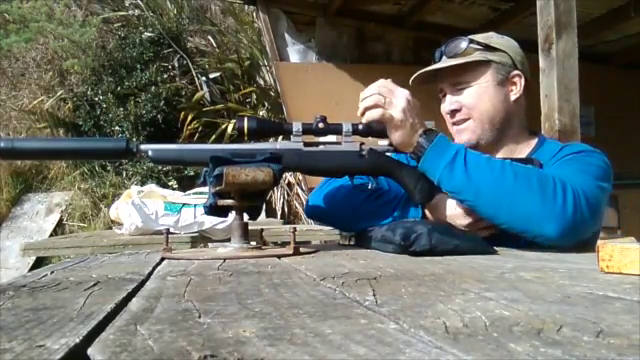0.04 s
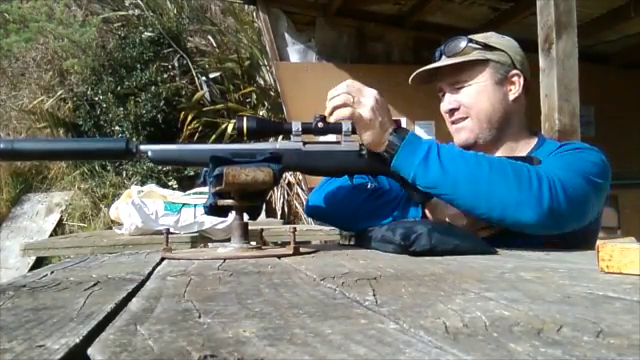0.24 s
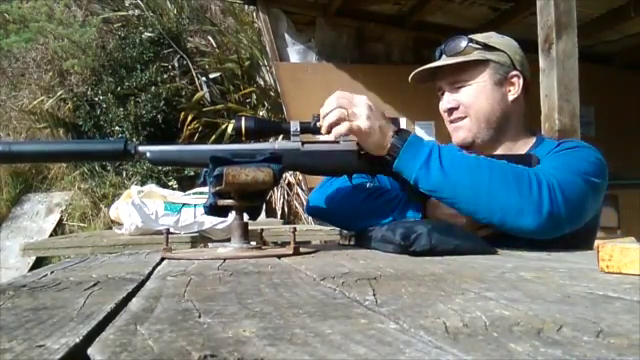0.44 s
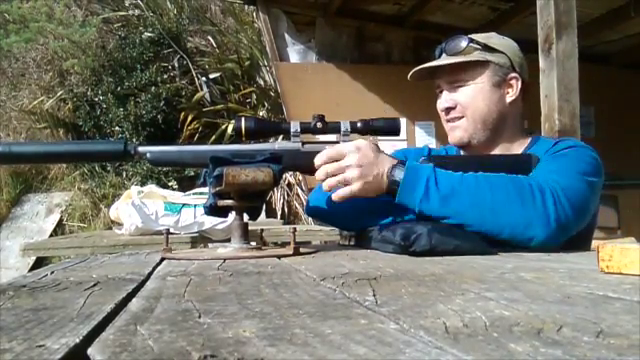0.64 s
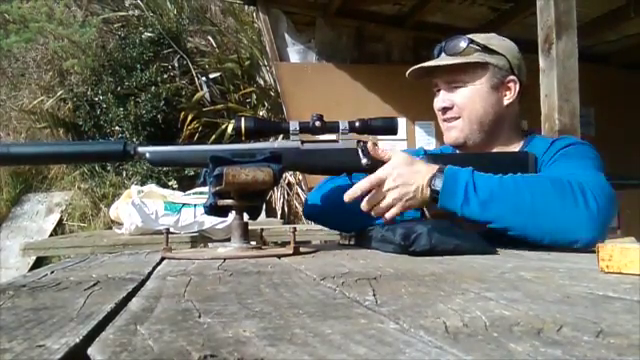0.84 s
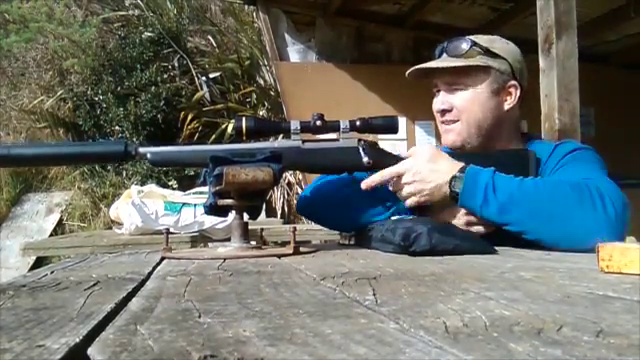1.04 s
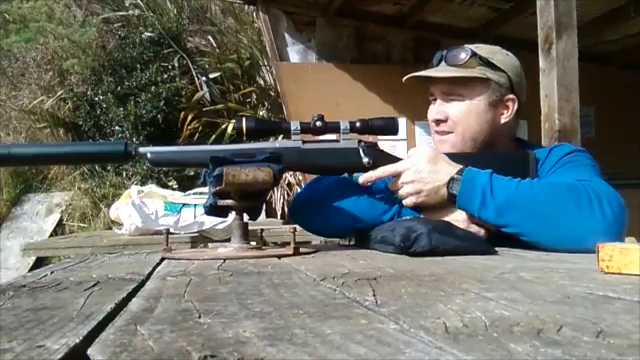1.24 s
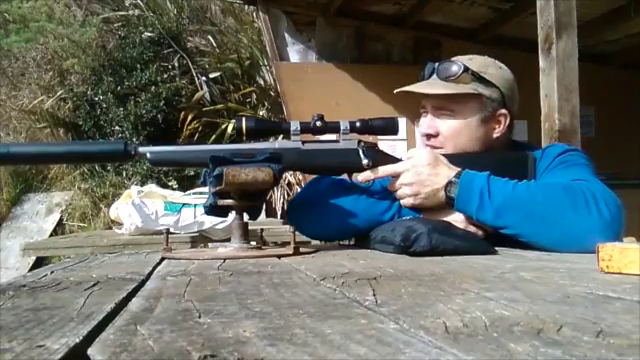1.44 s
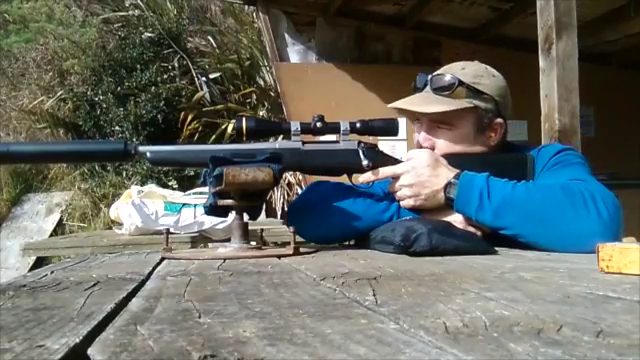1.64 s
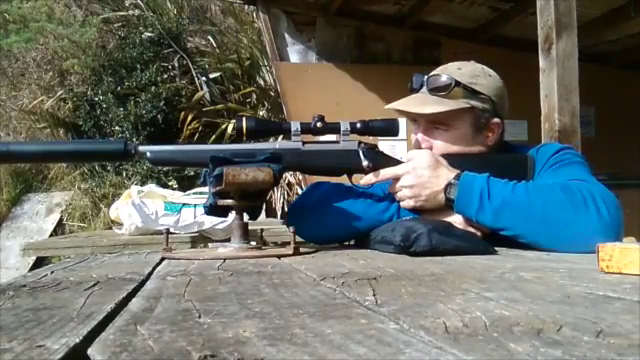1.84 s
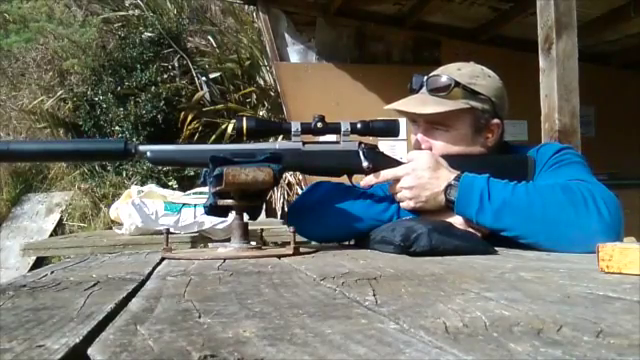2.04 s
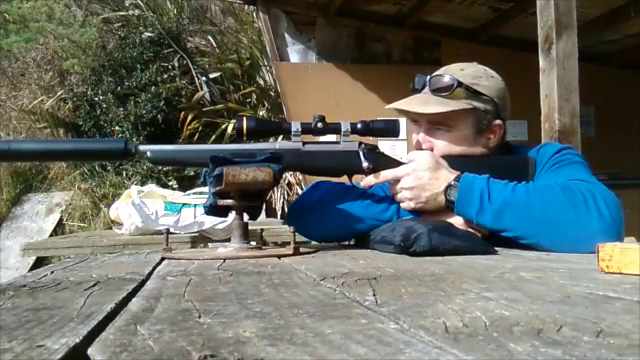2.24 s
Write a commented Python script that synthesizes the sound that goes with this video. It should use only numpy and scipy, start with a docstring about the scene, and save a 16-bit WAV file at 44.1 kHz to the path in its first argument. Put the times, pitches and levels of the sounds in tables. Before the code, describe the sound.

A rifle bolt is worked in two quick bursts of steel clicks, followed by soft cloth rustle

```python
"""Wind hiss, a low outdoor rumble and the first scrape of a rifle bolt open the scene under a shelter.
The bolt rubs softly, a brass case chimes as it is fed, and steel knocks ring the action as it is locked;
echoes and a short noise tail answer, and the wooden bench booms. Then a sleeve rustles as filtered grains,
far birds call as gliding sines, and small ticks fall. A phone picks it up."""
import sys
import numpy as np
from scipy import signal
from scipy.fft import rfft, irfft
from scipy.io import wavfile
from scipy.ndimage import uniform_filter1d

SR = 44100
rng = np.random.default_rng(int(sys.argv[2]) if len(sys.argv) > 2 else 0)


def transcribe(u):
    """Save the signal u as a 16-bit wav file named by the first command-line argument.

    u: samples, shape (n,) or (channels, n), limited to [-1, 1]; the rate is SR.
    q: integer samples, one column per channel.
    """
    v = np.clip(np.atleast_2d(u).T, -1, 1)
    q = np.round(v * 32767).astype(np.int16)
    wavfile.write(sys.argv[1], SR, q)


def voltage_ratio(level):
    """Linear amplitude factor for a level in decibels (scalar or array-like)."""
    return 10 ** (np.asarray(level, float) / 20)


N = 101429  # length in samples


def unit(x):
    """Normalisation: scale to rms 1."""
    return x / np.sqrt(np.mean(x ** 2))


def unit_energy(x):
    """Normalisation: scale an impulse response to energy 1."""
    return x / np.sqrt(np.sum(x ** 2))


def colour(x, points):
    """Linear filtering: spectral gain by (Hz, dB) points joined on a log frequency axis."""
    hz, db = np.array(points, float).T
    f = np.fft.rfftfreq(len(x), 1 / SR) + 1
    gain = voltage_ratio(np.interp(np.log(f), np.log(hz), db))
    return irfft(rfft(x) * gain, len(x))


def bump(x, hz, octaves):
    """Band-pass filtering: a bell on the octave axis around hz, scaled to rms 1."""
    f = np.fft.rfftfreq(len(x), 1 / SR) + 1
    bell = np.exp(-.5 * (np.log2(f / hz) / octaves) ** 2)
    return unit(irfft(rfft(x) * bell, len(x)))


def curve(rows, fade_s=0.013):
    """Amplitude envelope: gain along (s, dB) rows, fading out past both ends."""
    s, db = np.array(rows, float).T
    s = np.r_[s[0] - fade_s, s, s[-1] + fade_s]
    return voltage_ratio(np.interp(np.arange(N) / SR, s, np.r_[-130, db, -130]))


def decay(t, t60):
    """Exponential damping: 60 dB of fall in t60 s."""
    return np.exp(-np.log(1000) * t / t60)


def walk(rate):
    """Low-pass fluctuation: random values, rate a second, smoothed to a wander with spread near 1."""
    k = int(SR / rate)
    held = np.repeat(rng.standard_normal(N // k + 1), k)
    return np.sqrt(2) * uniform_filter1d(uniform_filter1d(held, k), k)[:N]


def convolve(x, h):
    """Superposition: causal convolution, kept to length."""
    return signal.fftconvolve(x, h)[:N]


def grit(rate, spread):
    """Stick-slip friction as an impulse train: random clicks, rate a second, of uneven size."""
    clicks = (rng.random(N) < rate / SR) * rng.choice([-1, 1], N)
    return clicks * 10 ** (spread * rng.exponential(size=N) / 20)


def push(x, t, push_s):
    """Contact force: x under a rise for push_s and a fall, with the energy of that pulse at peak 1."""
    env = t / push_s * np.exp(1 - t / push_s)
    return x * env * np.sqrt(np.sum(env ** 2) / np.sum((x * env) ** 2))


# far open-air noise spectrum before its overall level is set: hz, level_db (per Hz)
AIR = [(15, -29), (25, -2.5), (82, 4), (206, -5.5), (575, -11.5), (1100, -18), (1290, -18.5), (4370, -22.5),
       (5280, -24), (5730, -23.5), (6920, -27), (8590, -24), (16000, -32)]
# low wind rumble: start_s, level_db
RUMBLE = [(0, -62.5), (.5, -59.5), (1., -67), (1.5, -66), (1.8, -70.5), (2.3, -66)]


def outdoors():
    """Broadband noise: a steady far hiss whose bass swells with the wind and flickers."""
    air = unit(colour(rng.standard_normal(N), AIR)) * voltage_ratio(-65)
    low = signal.sosfilt(signal.butter(4, 180, fs=SR, output="sos"), air)
    # the bass is taken out and put back at its own level
    return air - low + unit(low) * curve(RUMBLE) * voltage_ratio(2.0 * walk(37))


# pitches of the steel action's modes, shared by scrapes and contacts: pitch_hz
ACTION_HZ = 340, 700, 1290, 1600, 2074, 2490, 3034, 3335, 3668, 3940, 4160, 4650
# level and decay of those modes, in the same order: level_db, t60_s
ACTION = [(-9, 0.1), (-2.5, .06), (-20, .03), (-20, 0.03), (-17.5, 0.11), (-4, 0.042), (-18.5, 0.042),
          (-9.5, 0.026), (-14, 0.034), (-4, 0.076), (-13.5, 0.06), (-12.5, 0.037)]
# strokes of the bolt sliding in the action, one list each: start_s, level_db
SLIDES = [
    [(0.0, -70.5), (0.008, -62.5), (0.024, -70), (0.058, -68.5), (0.07, -57.5)],
    [(0.094, -51), (.119, -43), (0.126, -37.5), (0.13, -32), (0.154, -41), (0.17, -27), (0.2, -44.5),
     (0.212, -30), (0.29, -68.5), (0.318, -46.5)],
    [(0.594, -51.5), (0.628, -49), (0.644, -47)],
]
# spectrum of the scrape: hz, level_db (per Hz)
SLIDE = [(180, -52.5), (300, -34.5), (946, -6), (1530, -7), (3240, -3), (6100, -14.5), (7080, -20.5),
         (11900, -48), (13300, -26.5), (16000, -47)]


def slide():
    """Friction-driven resonance: grit under the bolt scrapes and keeps the action's modes ringing."""
    t = np.arange(8192) / SR
    effort = sum(curve(stroke) for stroke in SLIDES)
    modes = sum(voltage_ratio(db) * decay(t, t60) * np.sin(2 * np.pi * hz * t)
                for hz, (db, t60) in zip(ACTION_HZ, ACTION))
    grains = unit(grit(3100, 1.5))
    scrape = unit(colour(grains, SLIDE)) * effort
    ringing = convolve(grains * effort, unit_energy(modes))
    return scrape + voltage_ratio(-9) * ringing


# early echoes of the shelter: start_s (delay), level_db
ECHOES = [(.0045, -27), (0.0101, -17.5), (0.015, -14)]
# decay of the shelter's tail: hz, t60_s
TAIL_T60 = [(150, 0.5), (700, 0.21), (1840, 0.26), (4000, 0.25), (8000, 0.34), (14000, 0.12)]


def shelter(x):
    """Reverberation: discrete wall echoes and a diffuse tail with a decay time for each band."""
    t = np.arange(SR // 2) / SR
    tail_start_s, tail_rise_s, tail_db = .0065, .004, -13
    band_hz, band_t60 = np.array(TAIL_T60).T
    tail = np.zeros(len(t))
    for hz in 100 * 2 ** np.arange(0, 7.6, .5):
        t60 = np.interp(np.log(hz), np.log(band_hz), band_t60)
        tail += bump(rng.standard_normal(len(t)), hz, 0.41) * np.sqrt(hz) * decay(t, t60)
    tail = tail * (1 - np.exp(-np.clip(t - tail_start_s, 0, None) / tail_rise_s))
    h = voltage_ratio(tail_db) * unit_energy(tail)
    for s, db in ECHOES:
        h[int(s * SR)] += voltage_ratio(db)
    return x + convolve(x, h)


def contact_ring(t, hz, thud_hz, thud_db):
    """Modal excitation: the action's modes near a contact's centre or thud are driven most."""
    reach_db = -25  # drive of a mode one octave away
    ring = np.zeros(len(t))
    for mode_hz, (db, t60) in zip(ACTION_HZ, ACTION):
        level_scatter, pitch_scatter = rng.standard_normal(2)
        from_centre = reach_db * np.log2(mode_hz / hz) ** 2
        from_thud = thud_db + reach_db * np.log2(mode_hz / thud_hz) ** 2
        level = voltage_ratio(db + 1.5 * level_scatter + max(from_thud, from_centre))
        tone = np.sin(2 * np.pi * mode_hz * (1 + 0.0072 * pitch_scatter) * t)
        ring += level * decay(t, t60) * tone
    return ring * (1 - decay(t, 0.0086))  # the modes build up after the contact


def contacts(rows, octaves, ring_db=-9, push_s=.0006, soften_per_db=.045):
    """Impact: each contact gives a short burst, a treble crack, a low thud and a modal ring."""
    out, t = np.zeros(N + 8192), np.arange(8192) / SR
    for s, db, hz, crack_db, thud_db, thud_hz in rows:
        body_noise, crack_noise, thud_noise = rng.standard_normal((3, len(t)))
        soft = 1 + soften_per_db * max(-16 - db, 0)  # contacts weaker than -16 dB push longer
        body = np.sin(2 * np.pi * hz * t) + 1.6 * bump(body_noise, hz, octaves)
        body = push(body, t, push_s * soft)
        crack = push(bump(crack_noise, 7700, .65), t, 0.00096) * voltage_ratio(crack_db)
        thud = np.sin(2 * np.pi * thud_hz * t) + .5 * bump(thud_noise, thud_hz, .22)
        thud = push(thud, t, 0.0015) * voltage_ratio(thud_db)
        ring = voltage_ratio(ring_db) * contact_ring(t, hz, thud_hz, thud_db)
        i = int(s * SR)
        out[i:i + len(t)] += voltage_ratio(db) * (body + crack + thud + ring)
    return out[:N]


# first soft, pitched rubs of the bolt; crack and thud are relative to level_db:
# start_s, level_db, pitch_hz (centre), crack_db, thud_db, thud_hz
RUBS = [(.0925, -46, 1600, -30.5, -22, 890), (.0965, -45.5, 4696, -30, -27.5, 900),
        (.0995, -44, 3400, -40, -20, 950), (.1030, -40, 2850, -36, 4, 703),
        (.1075, -43, 2524, -31.5, 7.5, 720)]


def rubs():
    """Soft contact: weak, long pushes in a narrow band give pitched rubs."""
    return contacts(RUBS, octaves=.12)


# lengthwise modes of the brass case: pitch_hz
BRASS_HZ = 6055, 12918
# level and decay of those modes, in the same order: level_db, t60_s
BRASS = [(5.5, 0.05), (0.5, 0.03)]
# drive of the case by the bolt face: start_s, level_db
BRASS_DRIVE = [(.12, -72.5), (.129, -43.5), (.136, -60), (.155, -53), (.162, -38.5), (.175, -45),
               (.19, -54), (.22, -53), (.25, -68.5)]


def brass():
    """Forced vibration: the bolt face rubs the case, which rings at its two lengthwise modes."""
    t = np.arange(8192) / SR
    drive = unit(grit(5700, 0.52)) * curve(BRASS_DRIVE)
    out = np.zeros(N)
    for hz, (db, t60) in zip(BRASS_HZ, BRASS):
        mode = np.sin(2 * np.pi * hz * t) * decay(t, t60)
        mode = mode / np.sqrt(t60 * SR / (4 * np.log(1000)))  # energy near 1
        out += voltage_ratio(db) * convolve(drive, mode)
    return out


# steel knocks; crack and thud are relative to level_db:
# start_s, level_db, pitch_hz (centre), crack_db, thud_db, thud_hz
KNOCKS = [(.1235, -28, 2910, -21, -26, 800), (.1283, -15, 3300, -24.5, -18.5, 1163),
          (.1342, -18, 1965, -20.5, -9.5, 1400), (.1380, -21, 3100, -19, -12, 830),
          (.1604, -30, 3240, -9.5, -12.5, 700), (.1682, -15, 3640, -14.5, -12.5, 736),
          (.1728, -16, 3640, -14.5, -18, 746), (.1835, -30, 4030, -12.5, -8.5, 749),
          (.2030, -32.5, 2860, -22, -3, 480), (.2115, -27, 3950, -21.5, -4, 1350),
          (.2435, -36.5, 2230, -25.5, -5.5, 1506), (.2990, -48, 1600, -23, -4.5, 935.6),
          (.3095, -44.5, 2980, -33.5, -2.5, 810), (.3268, -26, 3470, -14.5, -13.5, 1330),
          (.3325, -16.5, 3720, -26.5, -17.5, 1260), (.3335, -25, 2450, -22, -2, 790),
          (.5900, -47.5, 3260, -17, 0, 994), (.5960, -42, 2630, -15, -6.5, 969),
          (.6025, -37.5, 3900, -15, -8, 686), (.6135, -32, 2760, -18, -8, 1194),
          (.6240, -29, 2900, -23.5, -14, 576), (.6360, -38.5, 3680, -16, -25, 660),
          (.6516, -16.5, 3380, -21, -14, 1010), (.6522, -23, 2450, -30, -8, 420),
          (.6538, -24, 3980, -19, -2, 611), (.6635, -32, 3900, -14, -8.5, 690)]


def knocks():
    """Impact and reflection: neighbouring blows land on different parts, with their own wall paths."""
    return sum(shelter(contacts(KNOCKS[k::3], octaves=0.42)) for k in range(3))


# booms of the bench top: start_s, level_db, pitch_hz
THUMPS = [(0.211, -53.5, 110), (0.253, -54, 150), (.34, -55.5, 100.2), (0.598, -53, 127.3),
          (0.653, -49.5, 139), (2.086, -62.5, 65.2)]


def bench():
    """Plate vibration: slow low booms of the planks after a jolt."""
    out, t = np.zeros(N + 8192), np.arange(8192) / SR
    for s, db, hz in THUMPS:
        boom = np.sin(2 * np.pi * hz * t) + 0.43 * bump(rng.standard_normal(len(t)), hz, .5)
        i = int(s * SR)
        out[i:i + len(t)] += voltage_ratio(db) * push(boom, t, 0.024)
    return out[:N]


# sleeve on the bench bag: start_s, level_db
SLEEVE = [(0.95, -83), (0.994, -69.5), (1.024, -73), (1.106, -55.5), (1.208, -66.5), (1.284, -55.5),
          (1.368, -67), (1.5, -72), (1.7, -76.5)]
# spectrum of the cloth: hz, level_db (per Hz)
CLOTH = [(180, -36), (300, -5), (401, 8), (750, -1), (1230, 0), (2510, -2), (4060, 3), (14000, -32)]


def sleeve():
    """Granular friction: dragging cloth gives fine grains whose level flickers."""
    cloth = unit(colour(grit(9000, 0.76), CLOTH))
    return cloth * curve(SLEEVE, fade_s=0.19) * voltage_ratio(1.5 * walk(60.27))


# bird notes: start_s, length_s, level_db, first_hz, last_hz
BIRDS = [(0.897, 0.021, -71, 4900, 4600), (1.1, 0.0434, -74.5, 4000, 4450), (1.2, 0.025, -76, 4520, 4000),
         (1.67, 0.071, -74, 5640, 5660), (1.98, 0.06, -75.5, 4500, 4850), (2.04, 0.028, -80.5, 6700, 6600),
         (2.9, 0.021, -74, 3400, 3020), (2.11, 0.056, -66, 5200, 4200), (2, 0.018, -76, 4100, 3480),
         (2.165, 0.11, -75, 4300, 4310)]


def birds():
    """Frequency modulation: gliding whistles, smeared by diffuse echoes from the bush."""
    out, t = np.zeros(N + SR), np.arange(SR) / SR
    for s, length, db, first_hz, last_hz in BIRDS:
        u = np.arange(int(length * SR)) / (length * SR)
        phase = 2 * np.pi * np.cumsum(first_hz + (last_hz - first_hz) * u) / SR
        i = int(s * SR)
        out[i:i + len(u)] += voltage_ratio(db) * np.sin(np.pi * u) * np.sin(phase)
    bush = unit_energy(rng.standard_normal(SR) * decay(t, 0.99))
    direct = out[:N] * voltage_ratio(3.3 * walk(58.4))  # the direct sound flickers
    return direct + voltage_ratio(1) * convolve(out, bush)


# small ticks of wood and gear; crack and thud are relative to level_db:
# start_s, level_db, pitch_hz (centre), crack_db, thud_db, thud_hz
TICKS = [(0.9832, -58, 3540, -20, -24, 710), (1.4044, -62, 3614, -21, 4, 434),
         (1.8277, -56.5, 4295, -26.5, -22, 514), (2.1618, -43.5, 3280, -23, -31, 349.5)]


def ticks():
    """Light impact: very short pushes give small ticks with a faint ring."""
    return contacts(TICKS, octaves=.35, ring_db=-17, push_s=.00022, soften_per_db=0)


def scene():
    """Superposition: bolt, brass and ticks sound in the shelter; bench, cloth, birds and air join."""
    near = knocks() + shelter(slide() + rubs() + brass() + ticks())
    # the small action radiates little below 240 Hz
    near = signal.sosfilt(signal.butter(3, 240, "high", fs=SR, output="sos"), near)
    return (outdoors() + near + bench() + sleeve() + birds())[None]


def band_limit(x):
    """A steep low-pass at the top of the band."""
    return signal.sosfilt(signal.butter(12, 16480, fs=SR, output="sos"), x)


def record(dry):
    """Band limiting and saturation: the phone drops deep bass, rounds off loud peaks and cuts the top."""
    ceiling, low_hz, top_hz = .42, 41.7, 16900
    dry = signal.sosfilt(signal.butter(3, low_hz, "high", fs=SR, output="sos"), dry)
    rounded = ceiling * np.tanh(dry / ceiling)
    mix = signal.sosfilt(signal.cheby2(10, 60, top_hz, fs=SR, output="sos"), rounded)
    return band_limit(mix)


dry = scene()
out = record(dry)
transcribe(out)
```